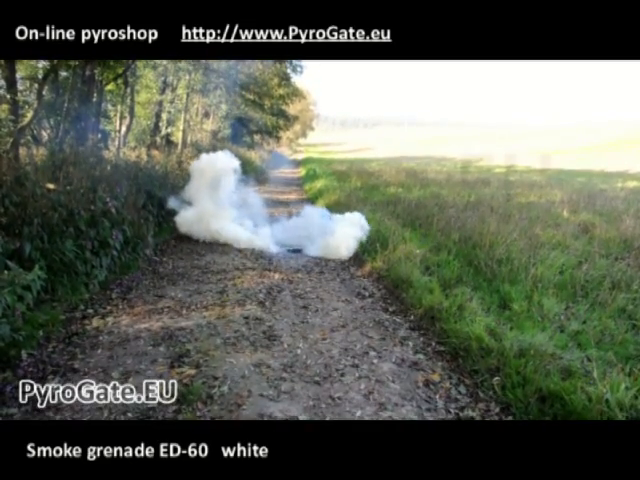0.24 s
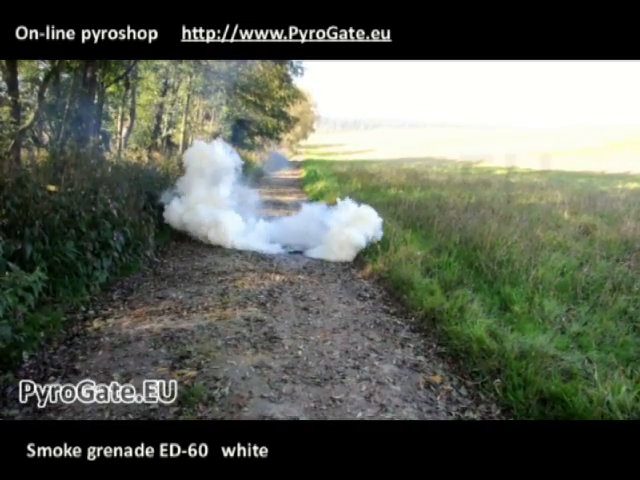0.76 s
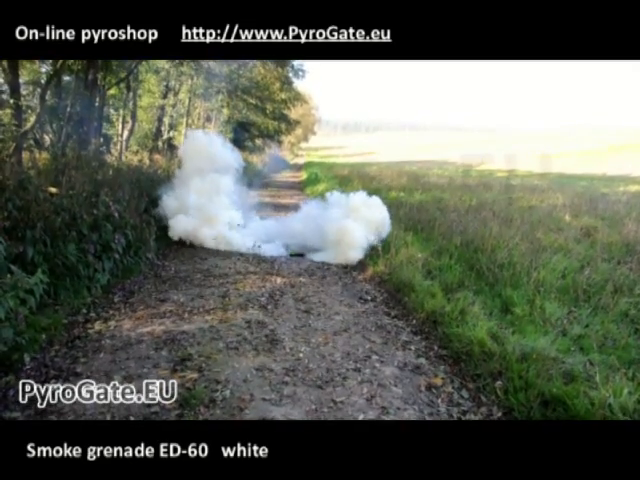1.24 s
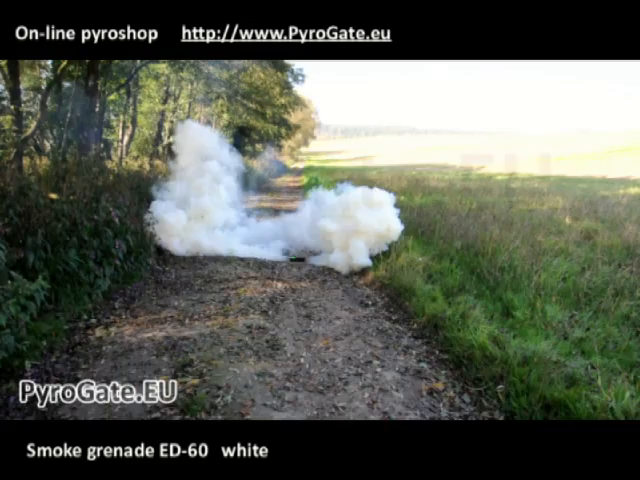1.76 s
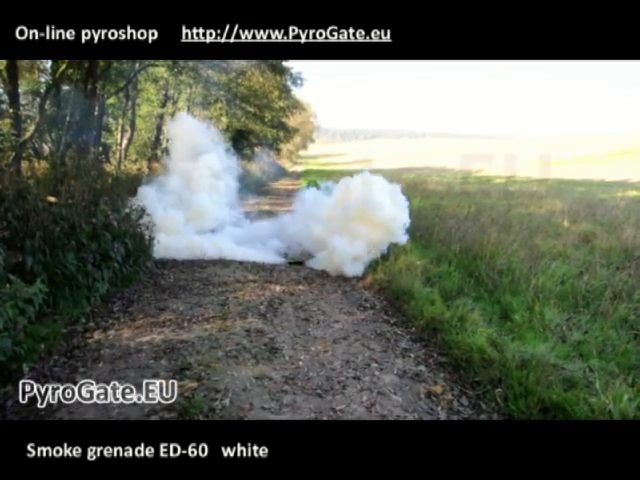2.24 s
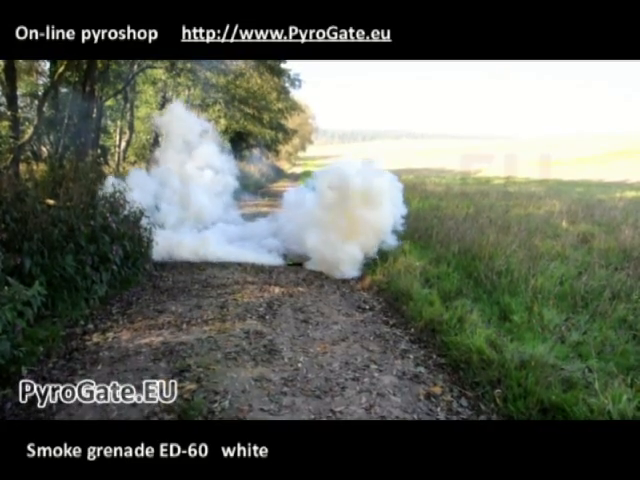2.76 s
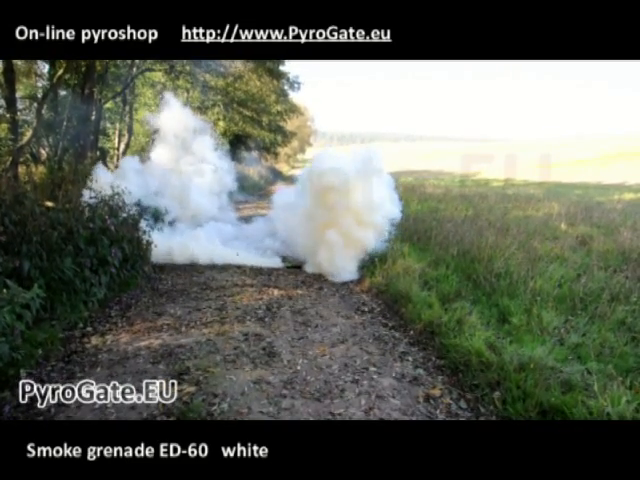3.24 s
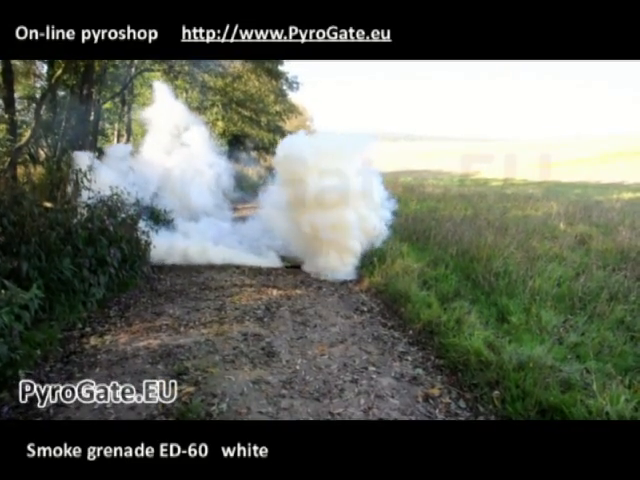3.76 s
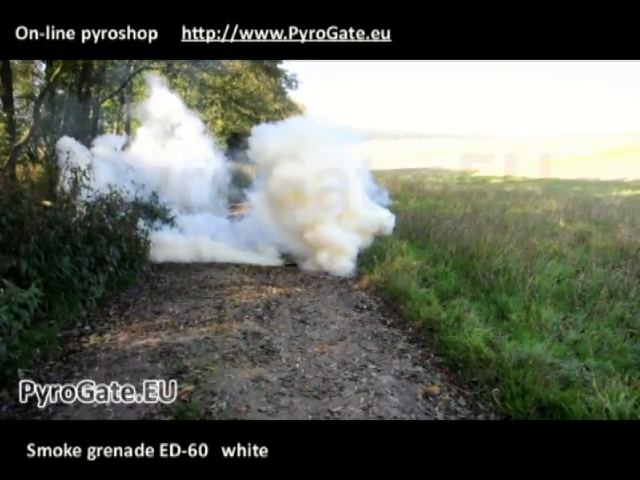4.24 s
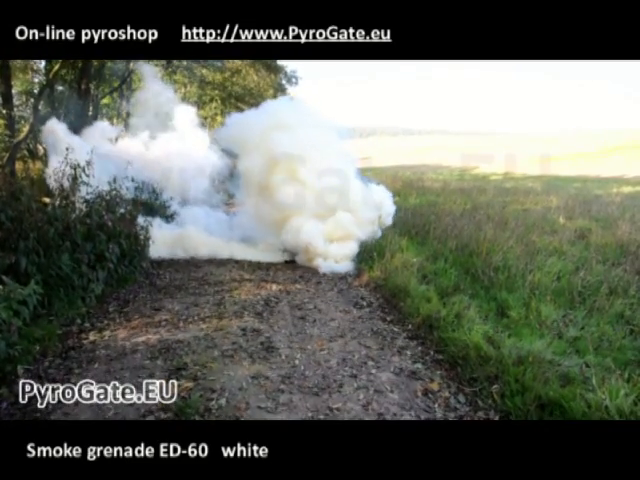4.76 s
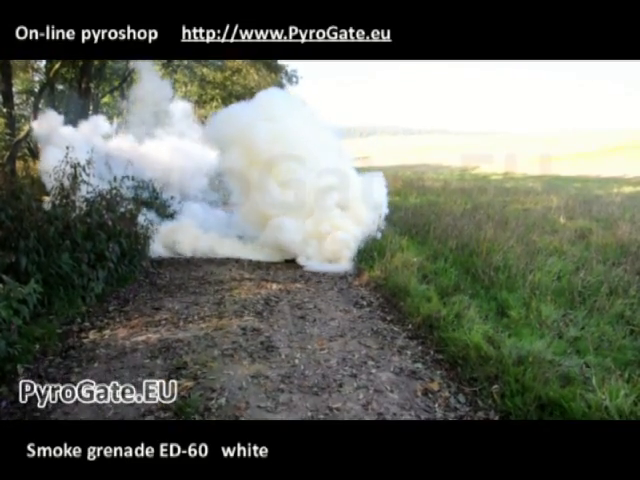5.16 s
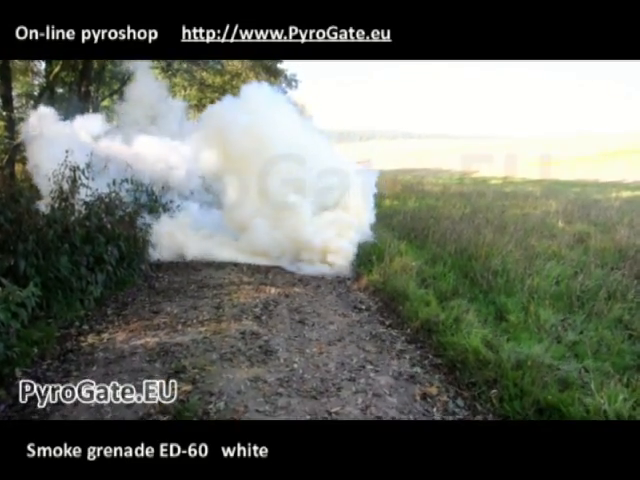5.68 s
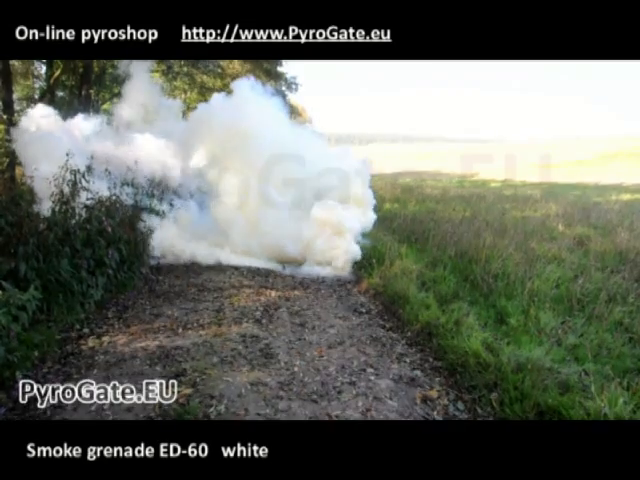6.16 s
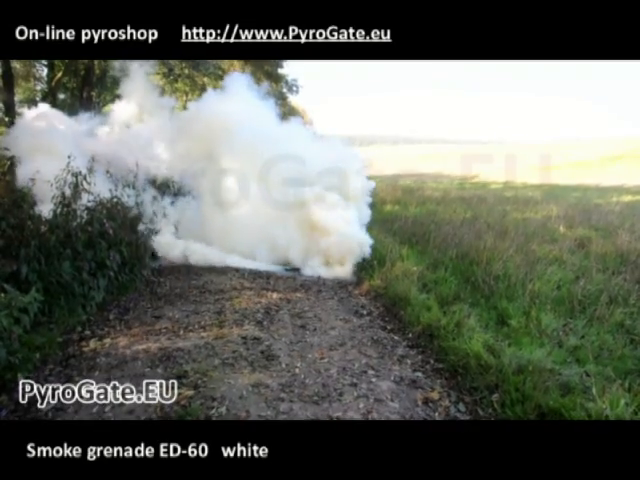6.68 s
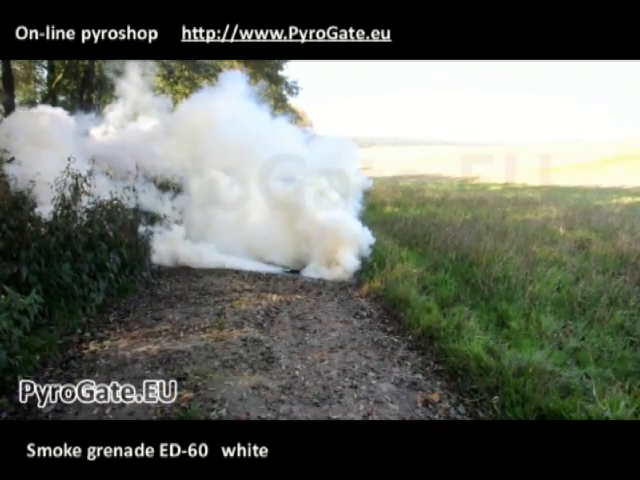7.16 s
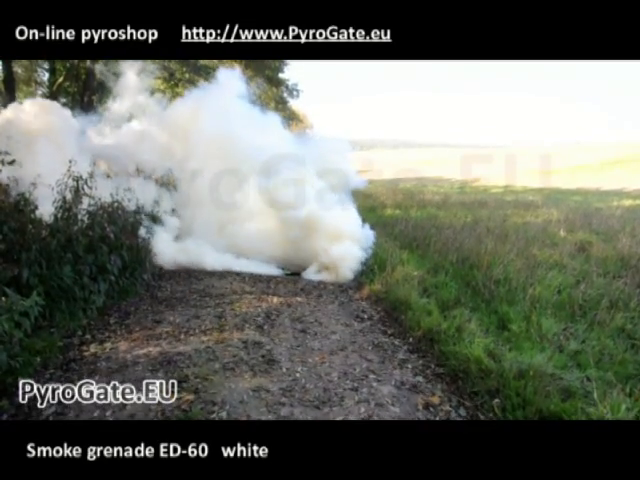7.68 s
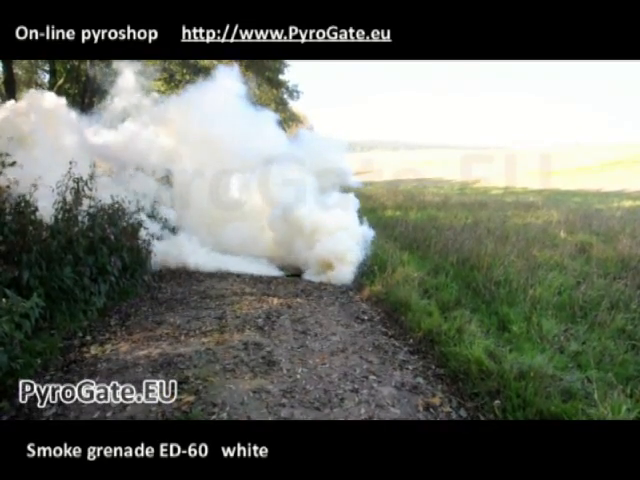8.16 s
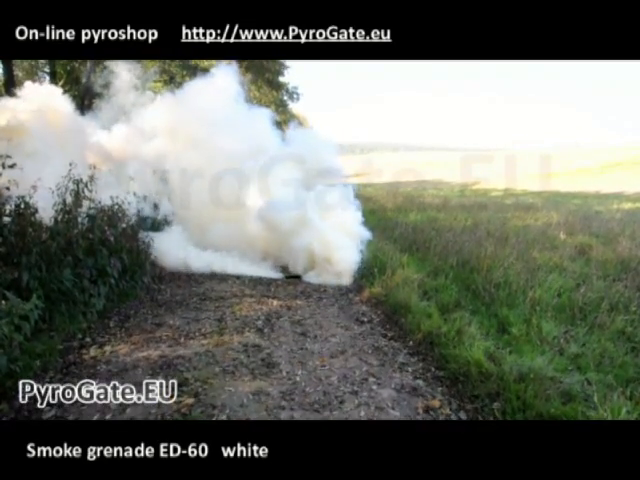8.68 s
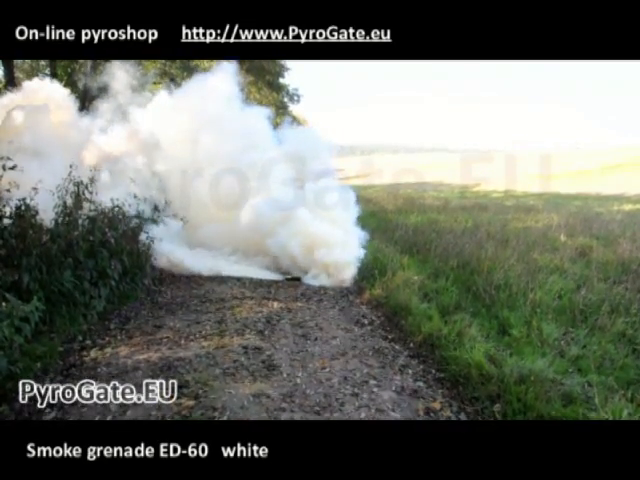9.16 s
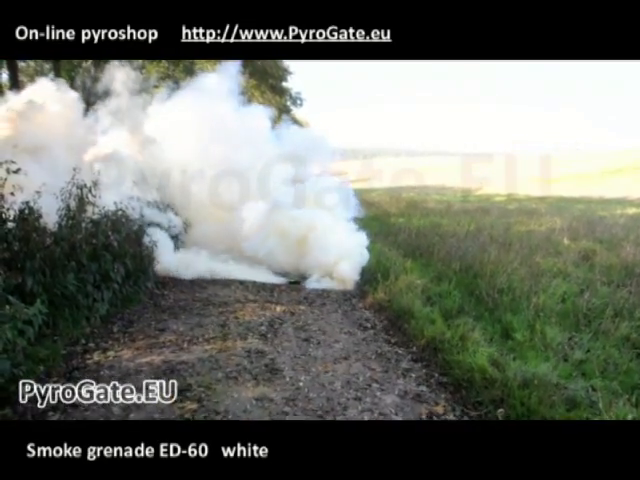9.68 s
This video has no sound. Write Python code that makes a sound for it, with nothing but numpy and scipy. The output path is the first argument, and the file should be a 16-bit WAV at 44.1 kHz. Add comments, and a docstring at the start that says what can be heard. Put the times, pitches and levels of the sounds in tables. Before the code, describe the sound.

Gas rushes continuously from a smoke grenade lying a few metres away outdoors. The hiss builds quickly, fluttering and sizzling at full pressure, with tiny crackles and a couple of short near-whistles. Afterwards it gradually sinks to a softer, lower, hollow roar that keeps going, with small surges and chokes. Track and trees give only slight reflections, and a very faint breeze rumble sits underneath.

```python
"""Smoke grenade on a dirt track

A few metres away, beside a field, gas jets from a burning can: it roars, hisses and spits faintly.
The jet swells, surges and sizzles as pressure builds, then slowly eases as it sinks.
The gas rings the vent, the shell and the hollow in the can, which drops in pitch as the charge
burns away. Track and trees reflect the sound, and light air nudges the microphone."""
import sys
import numpy as np
from scipy import signal
from scipy.fft import rfft, irfft
from scipy.io import wavfile

SR = 44100
rng = np.random.default_rng(int(sys.argv[2]) if len(sys.argv) > 2 else 0)


def master_out(mix):
    """Clip the mix to full scale and print it as 16-bit PCM to the path in sys.argv[1]."""
    frames = np.transpose(np.atleast_2d(mix))
    ceiling = np.clip(frames, -1, 1)
    pcm = np.round(ceiling * 32767).astype(np.int16)
    wavfile.write(sys.argv[1], SR, pcm)


N = 437472
TIME = np.arange(N) / SR
BUILD_START_S, BUILD_S, FULL_UNTIL_S = 0.5, 0.98, 2.63   # timing of the burn


def from_db(db):
    """Decibels to gain."""
    return 10 ** (np.asarray(db) / 20)


def rms_one(x):
    """Scale to unit rms."""
    return x / np.sqrt(np.mean(x ** 2) + 1e-20)


def butter(x, hz, kind, order=2):
    """Butterworth filter."""
    return signal.sosfilt(signal.butter(order, hz, kind, fs=SR, output="sos"), x)


def drift(rate_hz):
    """A slow random wobble of unit rms."""
    return rms_one(butter(rng.standard_normal(N + SR), rate_hz, "low")[SR:])


def since(start_s):
    """Seconds gone by since a moment, zero before it."""
    return np.maximum(TIME - start_s, 0)


def bump(peak_s, half_width_s):
    """A smooth rise and fall of height 1."""
    return np.exp(-0.5 * ((TIME - peak_s) / half_width_s) ** 2)


def settle(start_s, time_constant_s):
    """An exponential approach from 0 to 1."""
    return 1 - np.exp(-since(start_s) / time_constant_s)


def resonator(hz, width_hz):
    """Coefficients of a band-pass with gain 1 at its peak."""
    k = np.tan(np.pi * width_hz / SR)
    feedback = np.array([1 + k, -2 * np.cos(2 * np.pi * hz / SR), 1 - k])
    return np.array([k, 0, -k]) / (1 + k), feedback / (1 + k)


def resonance(x, hz, width_hz):
    """The band of a sound around one pitch."""
    return signal.lfilter(*resonator(hz, width_hz), x)


def gliding_resonance(x, hz, q, block=256):
    """A resonance whose centre follows a pitch curve, block by block."""
    out, state = np.zeros(N), np.zeros(2)
    for i in range(0, N, block):
        b, a = resonator(hz[i], hz[i] / q)
        out[i:i + block], state = signal.lfilter(b, a, x[i:i + block], zi=state)
    return out


def built_up():
    """How far the burn has built up, from 0 (smouldering) to 1 (full)."""
    return np.minimum(since(BUILD_START_S) / BUILD_S, 1)


def pressure(smoulder_db=-9.3, steady_db=-10, sink_s=2.84):
    """Pressure in the can in dB: it builds, holds at full (0 dB), then sinks towards a steady burn."""
    return smoulder_db * (1 - built_up()) + steady_db * settle(FULL_UNTIL_S, sink_s)


def jet_levels(full_db=-16):
    """Faders for roar, hiss and sizzle in dB: all follow the pressure, the sizzle most steeply."""
    pressure_db, sinking_s = pressure(), since(FULL_UNTIL_S)
    roar_db = full_db + 1.086 * pressure_db + 0.1845 * sinking_s   # the widening vent makes larger eddies
    hiss_db = full_db + 0.95 * pressure_db - 1.32 * sinking_s   # the jet slows
    sizzle_db = hiss_db - 4.5 + 5.1 * pressure_db
    return np.array([roar_db, hiss_db, sizzle_db]) + surges()


def turbulence(flutter_db, flutter_hz):
    """Gas noise that flutters with the uneven burn."""
    return rng.standard_normal(N) * from_db(flutter_db * drift(flutter_hz))


def spits(per_s, level_db, spread_db):
    """Bits of the charge burst in the nozzle: lone pressure spikes of uneven size."""
    spikes = (rng.random(N) < per_s / SR) * rng.choice([-1, 1], N)
    sizes = np.minimum(rng.exponential(1, N), 3)
    return spikes * from_db(level_db + spread_db * sizes)


def sputter(depth_db, rate_hz):
    """A flickering gain: the fine hiss follows small changes of jet speed most keenly."""
    return from_db(depth_db * drift(rate_hz))


def jet(crossover_hz, sizzle_hz):
    """Large eddies roar, small ones hiss and crackle; at full pressure the nozzle sizzles too."""
    roar_db, hiss_db, sizzle_db = jet_levels()
    gas = turbulence(flutter_db=-0.22, flutter_hz=35)
    crackle = spits(per_s=60, level_db=14, spread_db=2.5)
    roar = from_db(roar_db) * butter(gas, crossover_hz, "low", order=1)
    hiss = from_db(hiss_db) * butter(gas + crackle, crossover_hz, "high", order=1)
    smoulder_cut = (1 - from_db(-2)) * (1 - built_up())   # duller while the charge only smoulders
    hiss = hiss - smoulder_cut * resonance(hiss, hz=5500, width_hz=1600)
    nozzle_gas = turbulence(flutter_db=2.5, flutter_hz=6.5)
    sizzle = from_db(sizzle_db) * butter(nozzle_gas, sizzle_hz, "high", order=5)
    return roar + hiss * sputter(depth_db=1.0, rate_hz=36) + sizzle


# EQ curve of the jet: frequency_hz, gain_db
JET_EQ = [(25, -37.5), (70, -20.5), (140, -3), (220, -0.8), (340, 4), (780, 2), (1250, 0.9), (2000, -2),
          (3100, 1), (3850, 2), (4400, -2), (5050, 1.5), (5950, -3), (6550, -17.5), (7150, -25)]


def jet_colour(x):
    """The jet's overall tone: full mids, with the lows and the top rolled off."""
    hz, gain_db = np.transpose(JET_EQ)
    bins_hz = np.maximum(np.arange(N // 2 + 1) * SR / N, 1)
    curve_db = np.interp(np.log(bins_hz), np.log(hz), gain_db)
    return irfft(rfft(x) * from_db(curve_db), N)


# Resonances of the vent: pitch_hz, width_hz, level_db
VENT_RINGS = [(1500, 530, -3.5), (2380, 260, -4.5)]


def vent(flow, level_db=-1, opens_s=1.33, fade_db_per_s=32.5):
    """The vent rings until the jet burns it open."""
    ring_db = level_db - fade_db_per_s * since(opens_s)
    return flow + sum(from_db(ring_db + db) * resonance(flow, hz, width_hz)
                      for hz, width_hz, db in VENT_RINGS)


# Resonances of the can's shell: pitch_hz, width_hz, level_db
SHELL_RINGS = [(1820, 44, -16), (2090, 98, -16), (2420, 150, -16), (3020, 170, -17.5), (3790, 220, -16)]


def shell(flow):
    """The shell of the can rings faintly, colouring the jet throughout."""
    for hz, width_hz, db in SHELL_RINGS:
        flow = flow + from_db(db) * resonance(flow, hz, width_hz)
    return flow


# Falling pitch of the hollow: time_s, pitch_hz
HOLLOW_GLIDE = [(2.3, 3680), (3.0, 2960), (3.6, 2760), (4.1, 2300), (4.9, 2100), (6.8, 1900), (8.0, 1830),
                (9.92, 1740)]
# Its broad ring, half-whistling core and upper ring: pitch_ratio, q, level_db
HOLLOW_RINGS = [(1, 2.8, -0.2), (1, 9.9, -14.5), (1.45, 3, -10)]


def hollow(flow, small_db=-10, large_db=1.5, grow_s=0.66):
    """The hollow in the can grows as the charge burns away, so it rings lower and stands out more."""
    pitch_hz = np.interp(TIME, *np.transpose(HOLLOW_GLIDE))
    ring_db = small_db + (large_db - small_db) * settle(FULL_UNTIL_S, grow_s)
    for ratio, q, db in HOLLOW_RINGS:
        flow = flow + from_db(ring_db + db) * gliding_resonance(flow, ratio * pitch_hz, q)
    return flow


def undergrowth(x, level_db, t60_s, low_hz):
    """Stones, shrubs and twigs scatter a short, faint tail; long waves pass them by."""
    t = TIME[:SR // 4]
    tail = rng.standard_normal(len(t)) * from_db(-60 * t / t60_s)
    scattered = signal.fftconvolve(x, tail / np.linalg.norm(tail))[:N]
    return from_db(level_db) * butter(scattered, low_hz, "high")


# Bands where reflected sound cancels the direct sound: centre_hz, width_hz, depth_db
REFLECTION_NOTCHES = [(484.5, 213, -19.5), (1035, 172, -7.5), (2340, 70, -2), (2762, 270, -6.5),
                      (3413, 394, -6.5), (4590, 600, -2.5), (5530, 620, -9.5)]
# Faint echoes off the track and the trees: delay_s, level_db
OUTDOOR_ECHOES = [(.00336, -26.5), (.00456, -36), (0.0405, -25), (0.0432, -27.5)]


def reflections(x):
    """Slightly longer paths carve steady notches; farther ones return as faint echoes."""
    for hz, width_hz, depth_db in REFLECTION_NOTCHES:
        x = x - (1 - from_db(depth_db)) * resonance(x, hz, width_hz)
    return x + sum(from_db(db) * np.roll(x, round(delay_s * SR)) for delay_s, db in OUTDOOR_ECHOES)


# Fader rides on the jet: peak_s, half_width_s, roar_change_db, hiss_change_db, sizzle_change_db
JET_SURGES = [(1.375, 0.058, 2.5, 5, 8.5), (1.48, 0.035, 0.5, -3.5, -3), (1.595, 0.064, 1.9, 0.5, 8),
              (1.83, 0.084, 1, -5.5, 2.5), (1.945, 0.018, 1.5, -9.5, -7), (2.93, 0.091, 0.7, 0.5, 3),
              (3.47, 0.055, 0.6, -2, 1), (7.14, 0.03, 0.4, 2, -2), (7.27, 0.025, 0, -1, 0),
              (8.06, .03, -0.8, -1.5, 4), (8.58, .025, 0, 1.5, 7), (8.97, 0.14, -0.5, 3, -1),
              (9.5, .035, -0.5, -5, -1)]


def surges():
    """The jet briefly surges and chokes: dB offsets for roar, hiss and sizzle."""
    return sum(np.outer(changes_db, bump(peak_s, half_width_s))
               for peak_s, half_width_s, *changes_db in JET_SURGES)


# Breathy half-whistles: peak_s, half_width_s, pitch_hz, level_db
WHISTLE_FLARES = [(2.24, 0.071, 3720, 2), (3.585, 0.025, 2980, 2.5), (4.65, .1, 2030, -12),
                  (5.6, 0.13, 1800, -12), (6.5, .2, 1850, -13), (7.85, 0.27, 1830, -11)]


def flares(flow, width_hz=39):
    """Now and then a narrow band of the jet flares up and nearly whistles."""
    for peak_s, half_width_s, hz, db in WHISTLE_FLARES:
        flow = flow + from_db(db) * bump(peak_s, half_width_s) * resonance(flow, hz, width_hz)
    return flow


# Puffs of air on the microphone: peak_s, half_width_s, level_db
AIR_PUFFS = [(4.35, .03, -60), (7.24, 0.083, -52.5), (7.53, 0.021, -47), (9.865, .012, -41)]


def breeze(floor_db, band_hz):
    """Moving air makes a faint low rumble with a few soft puffs."""
    puffs = sum(from_db(db) * bump(peak_s, half_width_s) for peak_s, half_width_s, db in AIR_PUFFS)
    rumble = rms_one(butter(rng.standard_normal(N), band_hz, "band"))
    return (from_db(floor_db) + puffs) * rumble


def scene():
    """The jet rings the can and is heard over the ground, in light air."""
    flow = jet(crossover_hz=2980, sizzle_hz=4340)
    flow = flares(hollow(flow))
    grenade = jet_colour(vent(shell(flow)))
    scatter = undergrowth(grenade, level_db=-14.5, t60_s=0.11, low_hz=1270)
    outdoors = reflections(grenade + scatter)
    return (outdoors + breeze(floor_db=-63, band_hz=[48.3, 90]))[None]


def record(dry, top_hz=7400, high_band_db=-26, high_band_low_hz=10900, high_band_top_hz=14400):
    """A steep treble cut, with a very faint, thin band of high hiss at 11-14 kHz above it."""
    body = signal.sosfilt(signal.ellip(12, 0.1, 80, top_hz, fs=SR, output="sos"), dry)
    high_band = from_db(high_band_db) * butter(dry, [high_band_low_hz, high_band_top_hz], "band")
    top_cut = signal.ellip(8, 0.1, 70, high_band_top_hz, fs=SR, output="sos")
    return signal.sosfilt(top_cut, body + high_band)


dry = scene()
out = record(dry)
master_out(out)
```